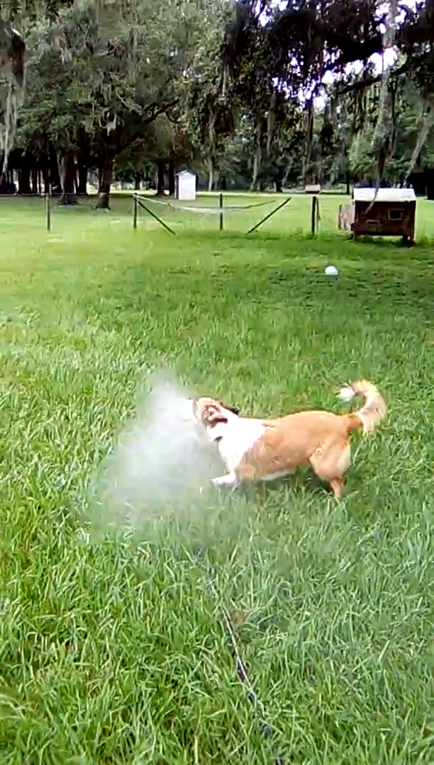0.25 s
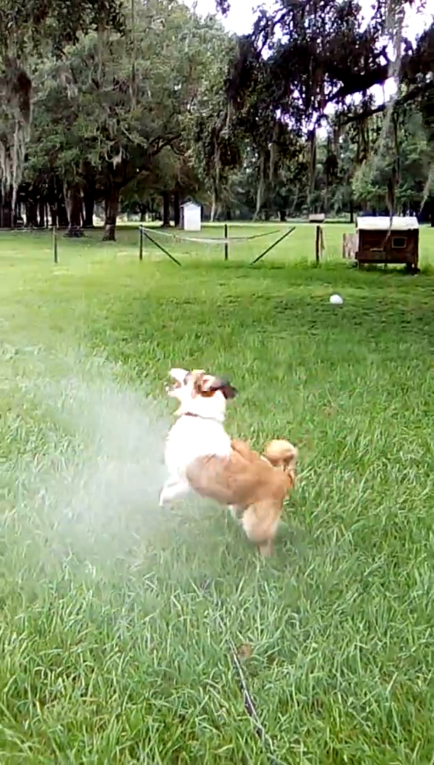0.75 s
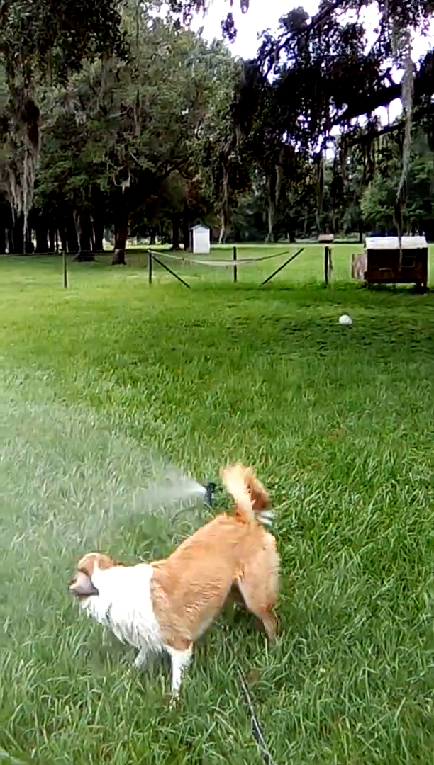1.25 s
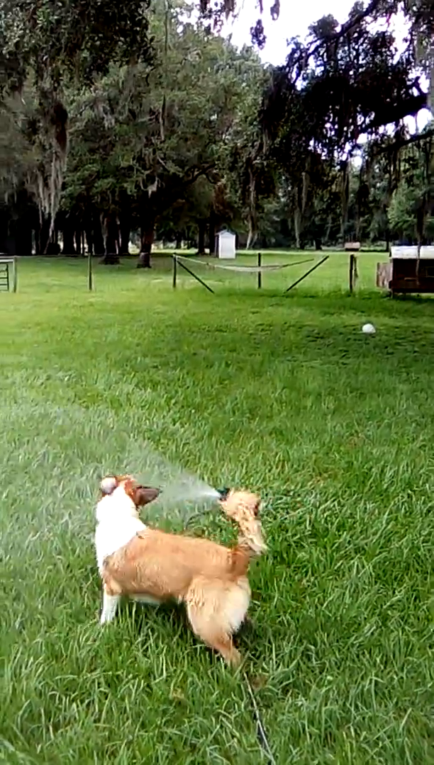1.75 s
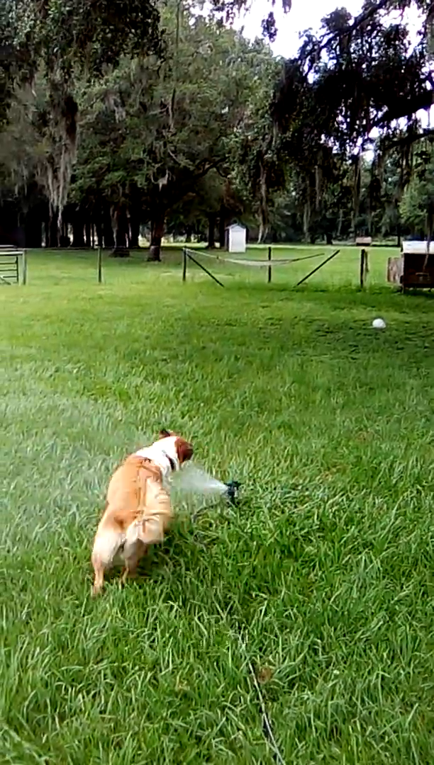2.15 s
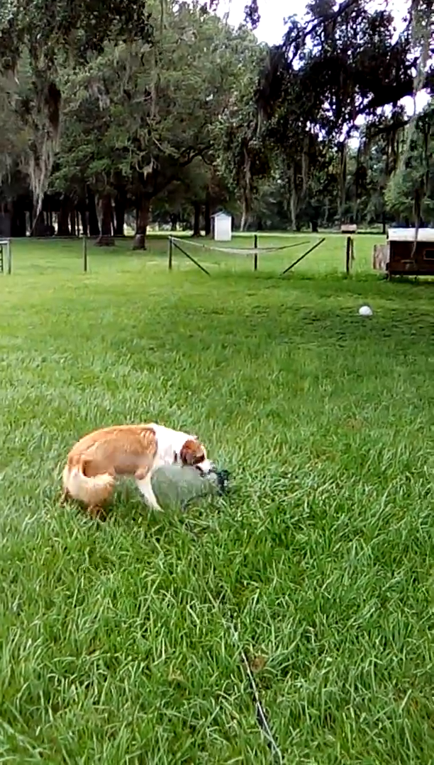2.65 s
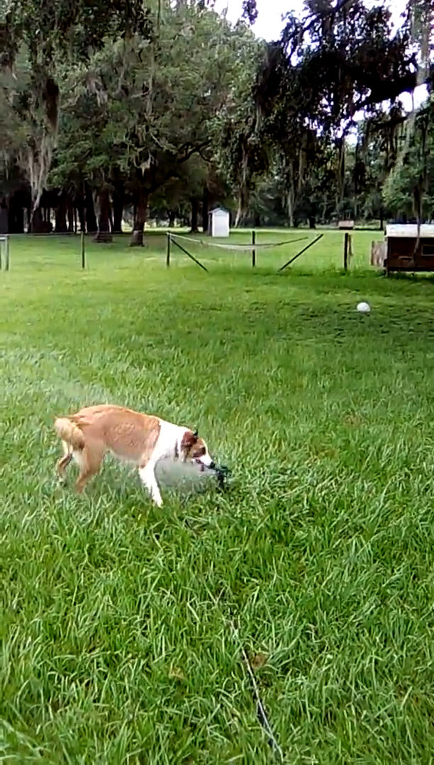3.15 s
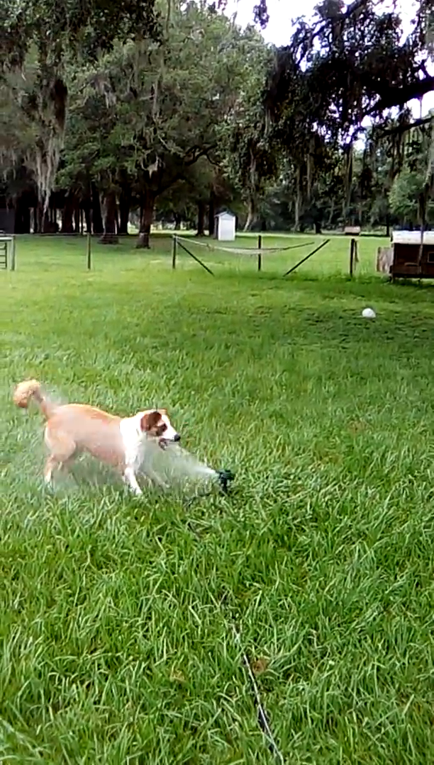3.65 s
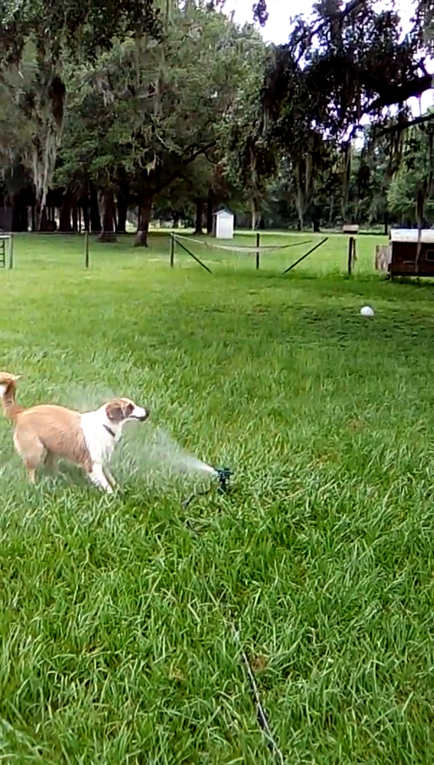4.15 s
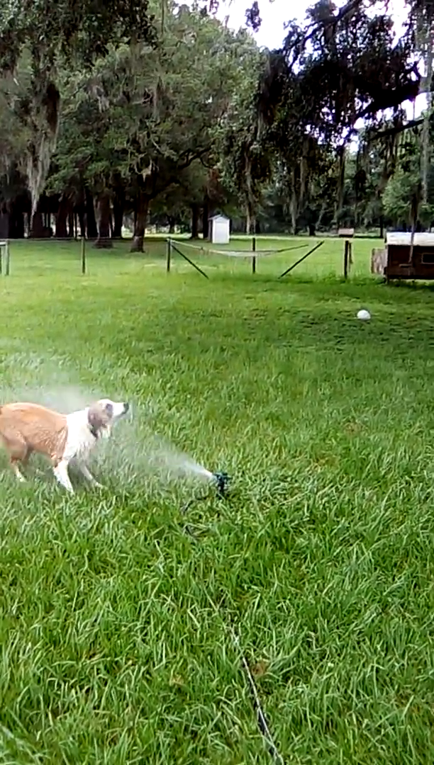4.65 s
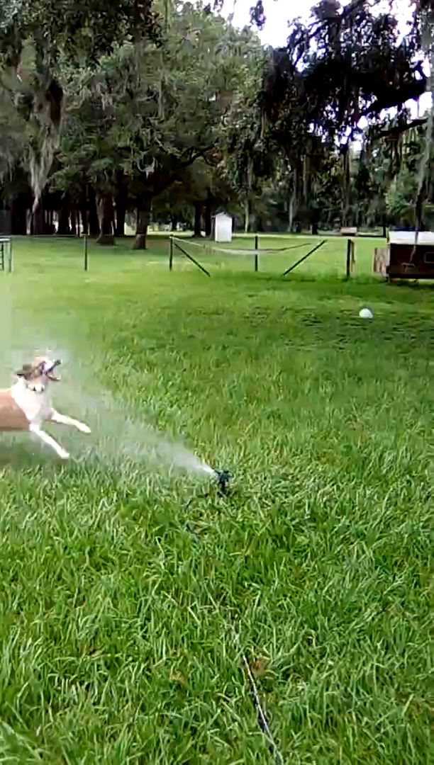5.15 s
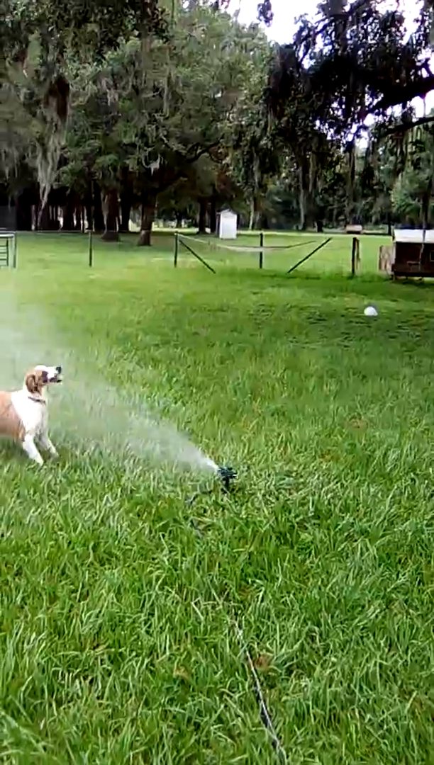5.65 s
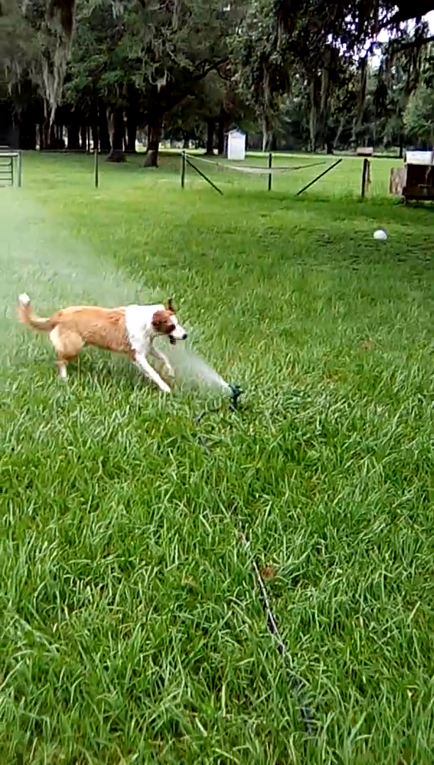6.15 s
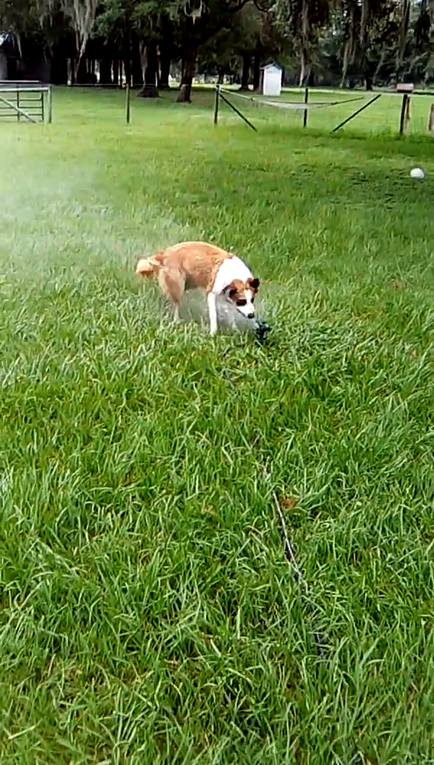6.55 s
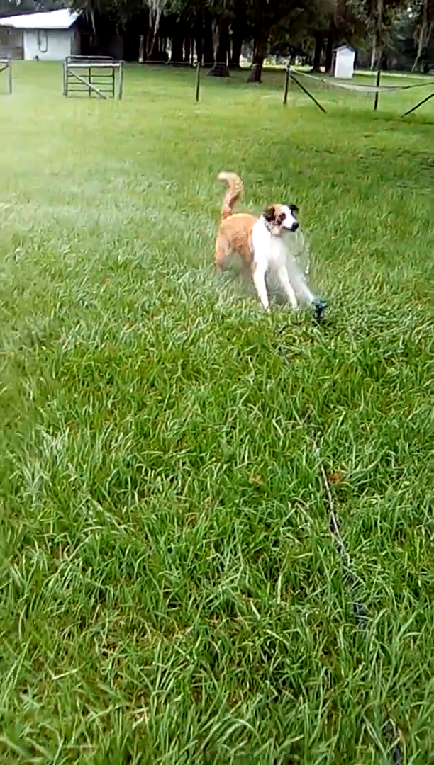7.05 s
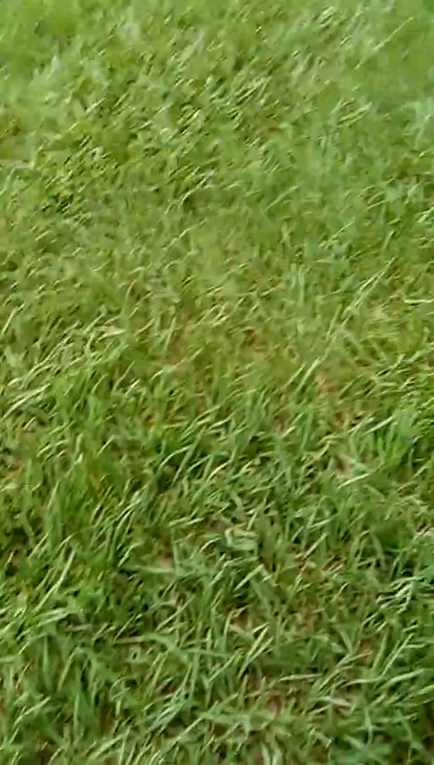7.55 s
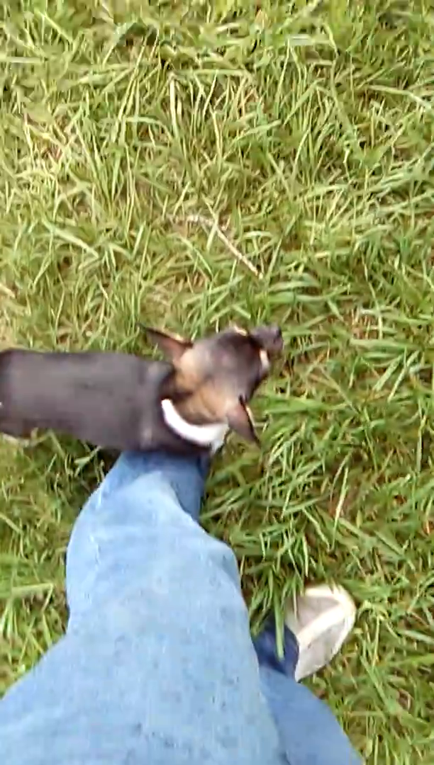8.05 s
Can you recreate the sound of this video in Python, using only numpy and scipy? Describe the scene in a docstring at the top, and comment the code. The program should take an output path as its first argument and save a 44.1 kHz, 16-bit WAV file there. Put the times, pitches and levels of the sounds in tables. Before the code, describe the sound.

A handheld microphone a little way from a sprinkler on open grass hears quick, regular metallic ticking and a continuous spray hiss with a faint fuzzy whistle. A dog biting and blocking the water makes brief wet gushes and splashy swells. Muffled thumps cluster in the first half, over a low breeze and faint distant machine hum. Finally the microphone tips toward the ground and the colour changes.

```python
"""An impact sprinkler runs on an open lawn near a hand-held camera while a dog plays in the jet.
From the start, filtered noise makes the spray's hiss, a faint whistle, the breeze and a far machine's hum,
and the arm knocks 8.5 times a second on the head, a set of damped modes. Near drops then snap as noise bursts,
the dog bites with gushes of resonant noise, low puffs thump the microphone, and splashes off fur swell the hiss.
Near the end the camera tips down: a ground echo strengthens and the tone shifts to the upper middle."""
import sys
import numpy as np
from scipy import signal
from scipy.fft import rfft, irfft
from scipy.io import wavfile
from scipy.ndimage import uniform_filter1d, map_coordinates

SR = 44100
rng = np.random.default_rng(int(sys.argv[2]) if len(sys.argv) > 2 else 0)


def wrap_up_sound(samples):
    """Save the sound to the file named by the first command line argument, as 16-bit audio."""
    columns = np.atleast_2d(samples).T
    # keep every value between -1 and 1, then stretch to whole-number steps
    tamed = np.clip(columns, -1, 1)
    steps = np.round(tamed * 32767).astype(np.int16)
    wavfile.write(sys.argv[1], SR, steps)


N = 365782
TIME = np.arange(N) / SR


def amp(db):
    """Level: decibels to a pressure ratio."""
    return 10 ** (np.asarray(db) / 20)


def unit(x):
    """Normalization: scales a signal to an rms of one."""
    return x / np.sqrt(np.mean(x ** 2) + 1e-20)


def colour(points, hz):
    """Spectral envelope: gain of a spectrum table, interpolated on a log-frequency axis."""
    f, db = np.transpose(points)
    return amp(np.interp(np.log(hz + 1), np.log(f), db))


def follow(table, t):
    """Linear interpolation: the columns of a curve table at the times t."""
    s, *columns = np.transpose(table)
    return [np.interp(t, s, column) for column in columns]


def peaks(table, hz):
    """Resonance: power sum of peaks with steep skirts, each 6 dB down at the edges of its width."""
    power = 0
    for centre_hz, width_hz, db in table:
        detuning = 2 * (hz - centre_hz) / width_hz
        power = power + (amp(db) / (1 + detuning ** 2)) ** 2
    return np.sqrt(power)


def tint(x, points):
    """Linear filtering: multiplies the spectrum of x by a spectrum table."""
    hz = np.fft.rfftfreq(len(x), 1 / SR)
    return irfft(rfft(x) * colour(points, hz), len(x))


def wander(rate_hz, size=N):
    """Low-pass noise: random motion of rms one, slower for a lower rate."""
    hz = np.fft.rfftfreq(size, 1 / SR)
    spectrum = rfft(rng.standard_normal(size)) / (1 + (hz / rate_hz) ** 4)
    return unit(irfft(spectrum, size))


def swell(t, rise_s):
    """Critically damped response: rises to one in the given time, then dies away."""
    u = np.maximum(t, 0) / rise_s
    return u * np.exp(1 - u)


def ring(t, hz, t60, rise_s):
    """Damped free vibration: a struck mode that builds up quickly and decays exponentially."""
    t = np.maximum(t, 0)
    decay = np.exp(-np.log(1000) * t / t60)
    build_up = 1 - np.exp(-t / rise_s)
    return np.sin(2 * np.pi * hz * t) * decay * build_up


def add(mix, s, sound):
    """Superposition: mixes a sound in at time s."""
    part = mix[max(round(s * SR), 0):][:len(sound)]
    part += sound[:len(part)]


def burst(t, length_s, rise_s=0.018, fade_s=0.051):
    """Envelope of a splash: rises, holds while the dog is in the jet, and fades exponentially."""
    return np.clip(t / rise_s, 0, 1) * np.exp(-np.maximum(t - length_s, 0) / fade_s)


# the jet: t/s, spray level/dB, treble tilt/dB per 5 kHz, nozzle rush level/dB
JET = [(0, -3, -11, -9), (0.35, -5.5, 0, -4), (1.15, -6, -3, -9.5), (1.28, -5, 4, -11.5),
       (1.8, -4, 6, -4.5), (2.4, -1.8, 2, -0.5), (2.7, 0.9, -1.5, 5.5), (4.3, 0.9, -1, 3.5),
       (5.4, -0.5, 2, -0.5), (6.2, -1.5, -0.5, -1), (6.7, -2.5, -1, 3), (7.5, 0, -0.5, -1),
       (7.85, -3.7, -5, -5.5), (8.29, -5, -1, -11)]
# spectrum of the free spray: f/Hz, level/dB
SPRAY = [(400, -50), (1400, -47.5), (2400, -38.5), (3900, -28), (5600, -41.5), (6300, -32), (7500, -33.5),
         (8400, -39.5), (9100, -50.5), (10500, -52), (11300, -47), (13500, -51.5), (15000, -69)]
# resonances of the head in the rushing spray: f/Hz, width/Hz, level/dB
HEAD = [(1817, 490, -37), (2820, 280, -30), (4340, 330, -31), (5320, 250, -27), (9600, 250, -43),
        (10160, 190, -45)]
# the rush in the nozzle: f/Hz, width/Hz, level/dB
NOZZLE = [(3378, 240, -22), (3635, 190, -24)]
# spectrum of water hitting fur: f/Hz, level/dB
SPLASH = [(400.0, -60), (1300.0, -50.5), (2000.0, -41.5), (2400.0, -25.5), (3500.0, -33), (5000.0, -18.5),
          (5700.0, -23.5), (6200.0, -38.5), (7500.0, -48.5), (10000.0, -43.5), (12000.0, -82),
          (15000.0, -54)]
# the dog gets into the jet: start t/s, length/s, splash off fur level/dB, scattered spray level/dB
SPLASHES = [(2.494, 0.13, -0.5, 3.5), (2.974, 0.086, -6, -3), (3.2, 0.062, -4, -2), (3.86, 2.65, -9, -20),
            (6.262, .15, -2.5, -6), (6.418, 0.11, 2.5, -18), (6.557, 0.33, -1, -14), (6.903, 0.67, -5, -14)]
PATTER_DB = -11  # the light splashing that never stops, relative to the spray


def water(tilt_hz=7500, patchy_db=1.3, flutter_db=1.02, grain_db=1.5):
    """Turbulent flow noise, shaped by spray, head resonances, nozzle rush and splash off fur."""
    grains = amp(grain_db * wander(2600))
    droplets = unit(rng.standard_normal(N) * grains)
    hz, t, z = signal.stft(droplets, SR, nperseg=512, noverlap=384)
    hz = hz[:, None]
    level, tilt, rush = follow(JET, t)
    flow, splash = amp(level), amp(level + PATTER_DB)
    # incoherent sources add in power
    for start, length, fur_db, scattered_db in SPLASHES:
        contact = burst(t - start, length)
        flow = np.hypot(flow, amp(scattered_db) * contact)
        splash = np.hypot(splash, amp(fur_db) * contact)
    spray = flow * np.hypot(colour(SPRAY, hz), peaks(HEAD, hz))
    fur = splash * colour(SPLASH, hz)
    nozzle = amp(rush) * peaks(NOZZLE, hz)
    # the treble beams, so it changes most as the dog and the camera move
    beam = amp(tilt * np.maximum(hz - tilt_hz, 0) / 5000)
    # random patches, smoothed over frequency and then time
    patches = uniform_filter1d(rng.standard_normal(z.shape), size=6, axis=0)
    patches = unit(uniform_filter1d(patches, size=12, axis=1))
    z = z * np.sqrt(spray ** 2 + fur ** 2 + nozzle ** 2) * beam * amp(patchy_db * patches)
    hiss = signal.istft(z, SR, nperseg=512, noverlap=384)[1][:N]
    return hiss * amp(flutter_db * wander(76))


# the fuzzy whistle drops in pitch as the dog noses the head: t/s, f/Hz
WHISTLE = [(0, 3510), (2.2, 3507), (2.65, 3385), (8.29, 3412)]


def whistle(db=-41, width_hz=50):
    """Narrow-band noise: the nozzle sings one unsteady note that grows with the rush."""
    hz, = follow(WHISTLE, TIME)
    rush = follow(JET, TIME)[2]
    phase = 2 * np.pi * np.cumsum(hz) / SR
    # two independent random envelopes in quadrature blur the note
    note = wander(width_hz) * np.cos(phase) + wander(width_hz) * np.sin(phase)
    return amp(db + rush) * note


# spectrum of the open field: f/Hz, level/dB
FIELD = [(15, -52), (35, -44), (60, -33.5), (110, -27.5), (200, -33.5), (300, -37), (450, -43), (700, -44),
         (1400, -48), (4000, -90), (15000, -80)]
# strength of the breeze: t/s, level/dB
BREEZE = [(0, 0.5), (1.3, 0), (2.8, 1), (4, -.5), (5.3, -1), (6.7, 0.5), (7.5, 1), (8.29, 2.5)]


def field():
    """Broadband ambient noise: low outdoor rumble that follows the breeze."""
    breeze, = follow(BREEZE, TIME)
    return amp(breeze) * tint(rng.standard_normal(N), FIELD)


# partials of the distant machine: f/Hz, rms level/dB before its wavering
HUM = [(120, -69), (241, -54), (299, -68.5), (419, -72.5), (599, -74), (1302, -72.5)]


def far_machine(waver_rad=0.56, level_waver_db=1.1):
    """Modulated partials: a far hum whose levels and phases waver at random."""
    hum = np.zeros(N)
    for hz, db in HUM:
        level = amp(db + level_waver_db * wander(6.9))
        hum += level * np.sin(2 * np.pi * hz * TIME + waver_rad * wander(4.7))
    return np.sqrt(2) * hum  # rms to peak


# a near reflection, its delay mostly shortening as the camera tips down: t/s, signed strength, delay/ms
HOLDER_ECHO = [(0, -0.016, 1.46), (3, -0.088, 1.33), (6, -0.15, 1.305), (7, 0.15, 1.45), (7.3, -0.2, 1.29),
               (7.6, -0.22, 0.89), (7.9, -0.17, 0.58), (8.29, -0.23, 0.38)]
# the camera tips down and hears the ground: t/s, echo strength (0-1), delay/ms
GROUND = [(7.2, 0.04, 0.28), (7.6, 0.26, .31), (7.9, 0.26, 0.308), (8.29, 0.62, .3)]


def echo(x, path):
    """Comb-filter interference: a reflection whose changing delay sweeps notches through the hiss."""
    strength, delay_ms = follow(path, TIME)
    source_sample = np.arange(N) - delay_ms * SR / 1000
    return strength * map_coordinates(x, [source_sample], order=3)


# the arm swings at a steady pace, with a new stride now and then: first knock t/s, period/s, knocks
STRIDES = [(0.0336, .11697, 6), (0.7366, .11736, 9), (1.7936, .11731, 32), (5.5451, .11683, 9),
           (6.5926, .11724, 8), (7.5284, .11602, 7)]
# knocks as the camera and dog move: t/s, low mode level/dB, high mode level/dB, hardness/dB of the overtones
KNOCK_TONE = [(0, -3.5, -5.5, -12), (0.4, -3.5, -2, -1), (0.8, -3.8, -2, -6), (1.2, -7, -8.5, -4),
              (1.6, -5, -3, 1), (2.25, 0, 0, 2), (3.2, 1, 2, 4), (4.3, 3.5, -1, 4), (5.85, 0.5, -3, 4),
              (6.2, 1, -5, -1), (6.9, -1, -2.5, 0), (7.55, -2.5, -17, 6), (7.9, -4, -10, -4.5),
              (8.29, -8, -13.5, -5)]
# pitch of the head's high mode: t/s, f/Hz
HIGH_MODE = [(0, 3530), (2.2, 3450), (3.3, 3350), (4.6, 3410), (8.29, 3415)]
# a dull clack under the ring, stronger as the camera tips down: t/s, level/dB relative to the low mode column
CLACK = [(0, -27), (5.5, -24), (6.5, -13), (7.5, -8.5), (8.29, -14)]
# overtones of the head under a knock: f/Hz, level/dB, t60/s
OVERTONES = [(1920, -35, 0.0092), (3720, -24.5, 0.01), (4220, -24, 0.012), (5050, -17.5, 0.0053),
             (5090, -25, 0.007), (6394, -27, 0.01), (7320, -35, 0.014), (8270, -20, 0.0029),
             (10020, -44, 0.0087), (11600, -36, 0.0036)]
# no two knocks are quite alike: standard deviations
LOW_SCATTER_DB, HIGH_SCATTER_DB, HARD_SCATTER_DB, HIGH_SCATTER_HZ = 1, 2, 1.0, 41


def knocks(low_hz=2860, low_db=-5.0, low_t60=0.011, high_db=-4.0, high_t60=0.01,
           clack_hz=3020, clack_t60=0.014, longest_rebound_s=0.0017, rebound=0.69,
           slap_db=-31, slap_s=0.0028, lead_s=0.0002):
    """Modal impact: the arm excites the head's modes, chatters once, and slaps through the jet."""
    out, t = np.zeros(N), TIME[:2048]
    times = np.concatenate([first + period * np.arange(count) for first, period, count in STRIDES])
    usual = np.transpose(follow(KNOCK_TONE, times) + follow(HIGH_MODE, times))
    spread = [LOW_SCATTER_DB, HIGH_SCATTER_DB, HARD_SCATTER_DB, HIGH_SCATTER_HZ]
    scatter = rng.standard_normal(usual.shape) * spread
    for s, (low, high, hard, high_hz) in zip(times, usual + scatter):
        pitch = 1 + 0.004 * rng.standard_normal()
        knock = amp(low_db + low) * ring(t, low_hz * pitch, low_t60, 0.0015)
        knock += amp(high_db + high) * ring(t, high_hz, high_t60, 0.0007)
        clack, = follow(CLACK, s)
        knock += amp(clack + low) * ring(t, clack_hz, clack_t60, 0.00077)
        again = t - longest_rebound_s * rng.uniform(0.753, 1.0)
        for hz, db, t60 in OVERTONES:
            hz = hz * (1 + 0.0033 * rng.standard_normal())
            level = amp(db + hard + 1.1 * rng.standard_normal())
            late = rng.uniform(0, 0.00016)
            first_hit = ring(t - late, hz, t60, 0.0007)
            second_hit = ring(again - late, hz, t60, 0.00022)
            knock += level * (first_hit + rebound * second_hit)
        slap = tint(rng.standard_normal(len(t)),
                    [(1200, -29), (3000, 2.5), (7500, 2), (9500, -13.0), (15000, -17)])
        add(out, s - lead_s, knock)
        # the arm cuts the jet just before it lands
        add(out, s - 0.001, amp(slap_db + hard / 2) * unit(slap) * swell(t, slap_s))
    # the small head radiates poorly below its first modes
    return tint(out, [(1000, -19), (1500, -7.5), (1900, 2), (2250, -9.5),
                      (2750, 0.5), (8500, -0.5), (12000, -0.5), (15000, -9)])


# drops landing close by: t/s, peak level/dB
DROPS = [(0.6375, -8), (.6457, -13.5), (.6484, -21), (.6570, -25), (.6715, -25), (.6878, -23.5),
         (.7115, -31)]
# spectrum of a drop: f/Hz, level/dB
DROP_COLOUR = [(200, -35), (900, -14), (2000, -11.5), (4000, -8), (5800, 7), (7000, -2), (8500, -22),
               (15000, -30)]


def drops(snap_s=0.00029):
    """Impulsive excitation: each near drop is one very short, bright burst of noise."""
    out, t = np.zeros(N), TIME[:512] - TIME[128]
    for s, db in DROPS:
        snap = tint(rng.standard_normal(len(t)) * swell(t, snap_s), DROP_COLOUR)
        add(out, s + t[0], amp(db) * snap / abs(snap).max())
    return out


# the dog bites at the water: t/s, level/dB, swell time/s
BITES = [(1.338, -42, 0.0094), (1.364, -49, 0.016), (4.225, -50, 0.031), (7.22, -49.5, 0.018)]
# resonances of the open mouth: f/Hz, width/Hz, level/dB
MOUTH = [(896, 220, 3), (1240, 310, 0.5), (2080, 510, -2), (2970, 290, -21)]


def bites():
    """Cavity resonance: short wet gushes of noise in the dog's open mouth."""
    hz = np.fft.rfftfreq(N, 1 / SR)
    gush = unit(irfft(rfft(rng.standard_normal(N)) * peaks(MOUTH, hz), N))
    return gush * sum(amp(db) * swell(TIME - s, rise_s) for s, db, rise_s in BITES)


# puffs of air on the microphone: t/s, level/dB, f/Hz, swell time/s
THUMPS = [(2.112, -35, 85, 0.0078), (2.206, -21, 101.8, 0.0061), (2.303, -33, 90, 0.0051),
          (2.346, -29.5, 130, 0.0094), (2.431, -32, 79.7, 0.019), (2.608, -25.5, 103, 0.016),
          (2.68, -35, 95.2, 0.018), (2.745, -28, 143.4, 0.014), (2.784, -30, 86, 0.0074),
          (2.855, -33, 97, 0.02), (2.944, -30, 108, 0.0056), (3.171, -29.5, 117.2, 0.022),
          (3.217, -24, 94, 0.012), (3.522, -36, 97.7, .014)]


def thumps(push=0.47, turbulence=0.42):
    """Turbulent pressure: each puff is a low push of a few cycles with low-pass noise in it."""
    out, t = np.zeros(N), TIME[:8192]
    for s, db, hz, rise_s in THUMPS:
        eddies = unit(tint(rng.standard_normal(len(t)),
                           [(28, -25), (60, 2.5), (160, 0.5), (280, -14.5), (500, -36), (2000, -80)]))
        puff = push * np.sin(2 * np.pi * hz * t) + turbulence * eddies
        add(out, s, amp(db) * swell(t, rise_s) * puff)
    return out


def scene():
    """Superposition: the sprinkler with its near reflections, and the sounds around it."""
    sprinkler = water() + whistle() + knocks()
    heard = sprinkler + echo(sprinkler, HOLDER_ECHO) + echo(sprinkler, GROUND)
    # tipped down, the microphone favours the upper middle and loses the top
    tipped, = follow([(6.9, 0.087), (7.8, 1)], TIME)
    tipped_tone = tint(heard, [(2000, 0.5), (4600, -2.0), (6200, 5.5), (7600, 0.5),
                               (10500, 3.0), (12500, -9), (15000, -1)])
    heard = (1 - tipped) * heard + tipped * tipped_tone
    return (heard + field() + far_machine() + drops() + bites() + thumps())[None]


EDGE_HZ = 15600


def record(dry):
    """Band limitation: a linear-phase low-pass filter removes the top of the spectrum."""
    lowpass = signal.firwin(401, EDGE_HZ, window=("kaiser", 9), fs=SR)
    return signal.oaconvolve(dry, lowpass[None], "same")


dry = scene()
out = record(dry)
wrap_up_sound(out)
```